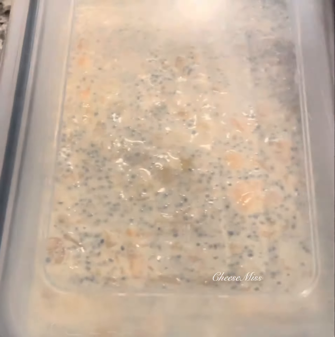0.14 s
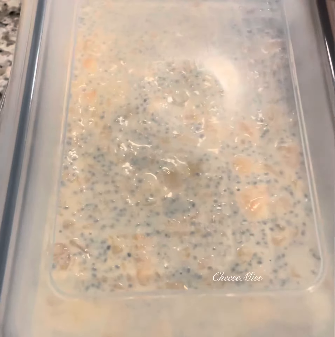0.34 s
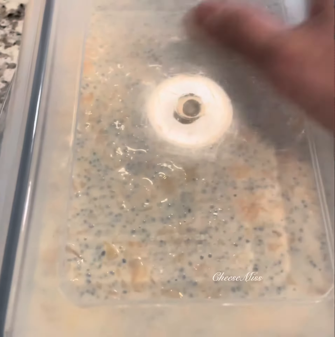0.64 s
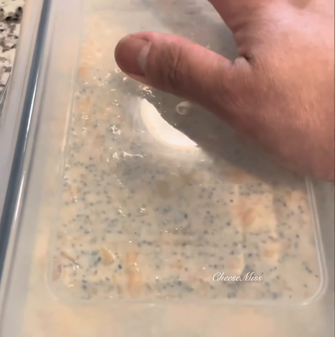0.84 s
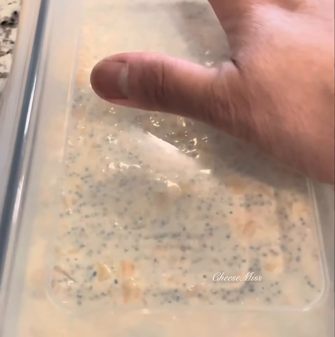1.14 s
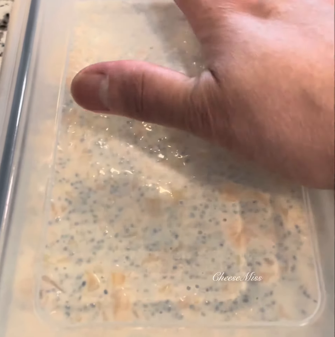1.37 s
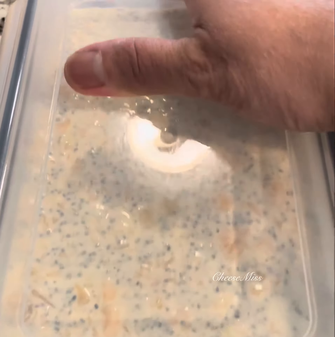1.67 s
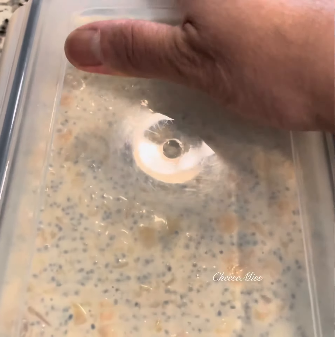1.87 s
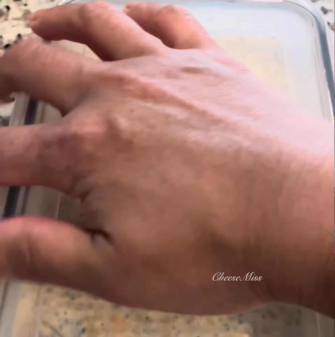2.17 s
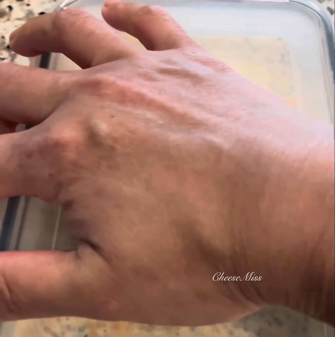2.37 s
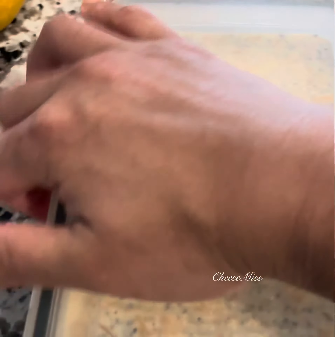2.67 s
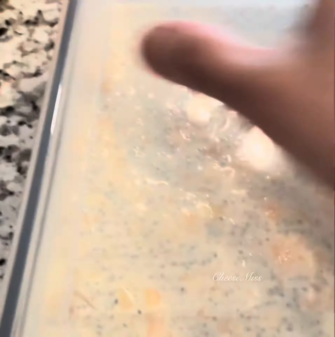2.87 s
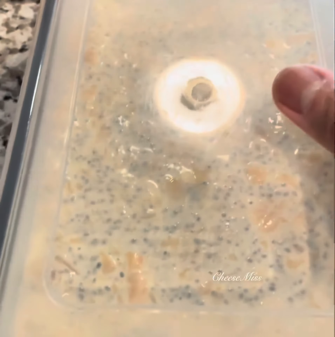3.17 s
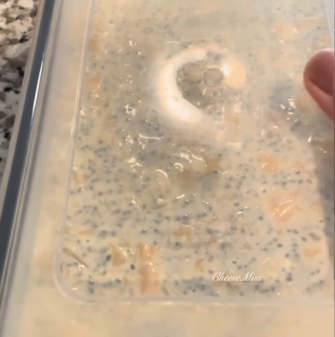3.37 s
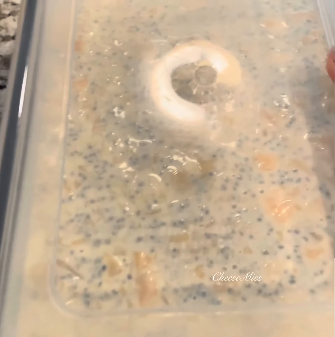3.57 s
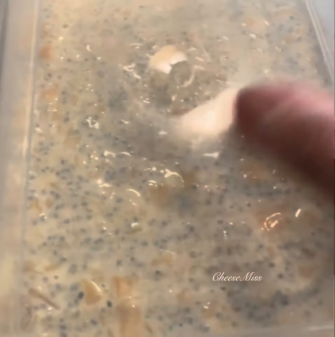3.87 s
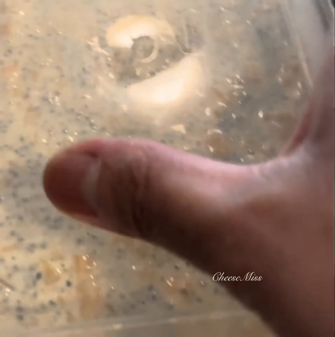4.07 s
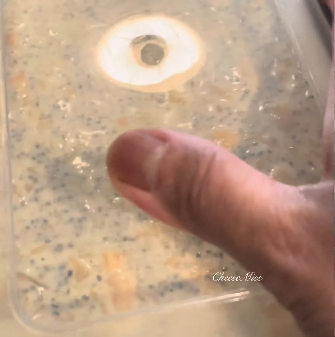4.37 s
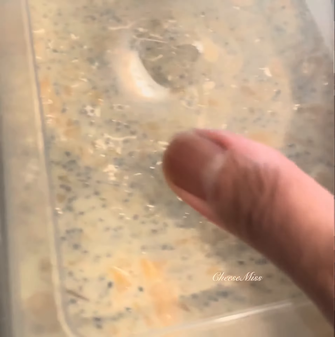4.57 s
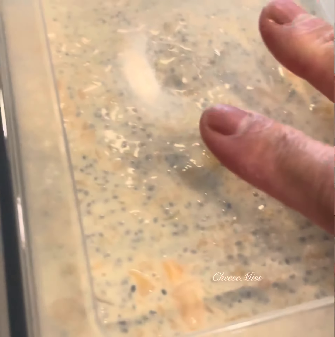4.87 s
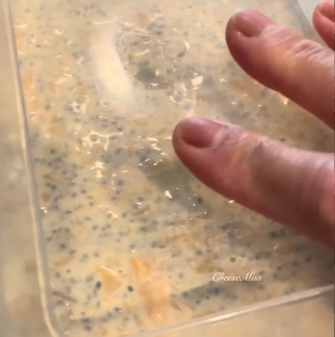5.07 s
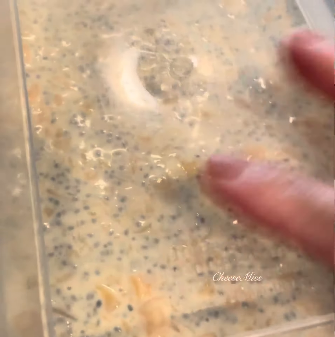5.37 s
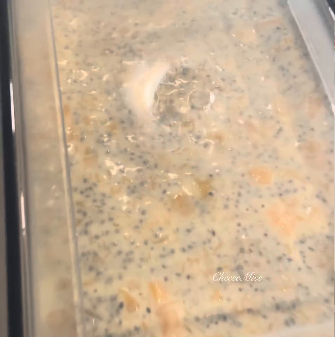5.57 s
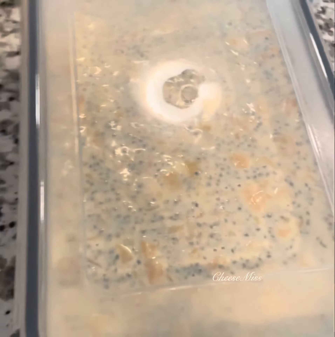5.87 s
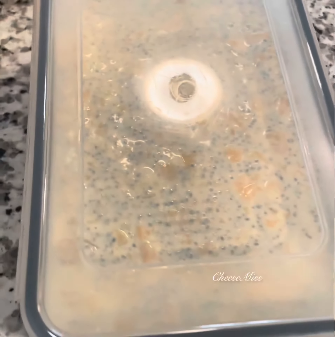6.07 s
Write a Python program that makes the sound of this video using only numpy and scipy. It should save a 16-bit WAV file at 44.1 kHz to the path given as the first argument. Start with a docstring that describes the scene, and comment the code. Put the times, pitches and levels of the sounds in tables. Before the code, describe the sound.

A thin plastic lid rattles loosely onto a food tub, then snaps and clicks sharply under a pressing hand in a quiet kitchen.

```python
"""A thin plastic lid knocks on a food tub and snaps shut by hand, close to two microphones in a quiet kitchen.
Each knock or snap runs through the lid as a bending wave, treble first, and rings its fading modes.
Uneven noise grains make the skin's scrape and swish; gliding narrow noise makes groans, creaks and a squeak.
Cracks leave a noisy rush, a short diffuse tail follows the near sounds, and the room hums below."""
import sys
import numpy as np
from scipy import signal
from scipy.fft import rfft, irfft
from scipy.io import wavfile

SR = 44100
rng = np.random.default_rng(int(sys.argv[2]) if len(sys.argv) > 2 else 0)


def amplitude_ratio(level_db):
    """Convert a level in decibels to the matching linear amplitude (field) ratio."""
    exponent = np.asarray(level_db, float) / 20
    return 10 ** exponent


def store_pcm(level_fs):
    """Save levels as 16-bit WAV."""
    pcm = np.round(np.clip(level_fs, -1, 1) * 32767).astype(np.int16)
    wavfile.write(sys.argv[1], SR, np.atleast_2d(pcm).T)


N = 275184  # length in samples
HZ = np.fft.rfftfreq(N, 1 / SR)


def snaps():
    """A short crackle travels as a bending wave and rings every mode; hand pressure detunes each blow."""
    # Ringing modes of the lid. Each row: usual pitch in Hz, level in dB, time to fade by 60 dB in seconds.
    lid_modes = [(71, -4, 0.031), (115, -4, 0.028), (238, -3.5, 0.029), (330, -6, 0.036),
                 (450, -24.5, 0.12), (600, -6, 0.02), (817.5, -13.5, 0.041), (1120, -1.5, .014),
                 (1387, -5, 0.015), (1767, -6.5, 0.014), (2050, -3, 0.00855), (2587, -3, 0.0071),
                 (3013, -5.5, 0.0066), (4104, -1, 0.006), (4935, 0, 0.0067), (5900, 4, 0.0031),
                 (7310, 4, 0.001), (9560, 0.5, 0.0011), (12040, -8, 0.0026), (15600, -24.5, 0.0037)]
    # Fading time of the hollow panel ring: loose, then held, in seconds for 60 dB.
    panel_t60_s = [0.039, .028]
    # Time a 1000 Hz wave needs to cross the lid: loose, then seated, in milliseconds.
    lag_ms = [0.56, 2.4]
    rim_t60_s, seated_from_s = 0.017, 0.7
    loose_panel_db = 2  # the hollow pitch stands out while the lid is loose
    lid_pan_db = -4  # left against right
    size = 8192  # samples
    s, body_db, thump_db, click_db, crack_db, panel_hz, rim_hz, rim_db = blows()
    mode_hz, mode_db, t60_s = np.transpose(lid_modes)
    hz = np.fft.rfftfreq(size, 1 / SR)
    z = np.exp(-2j * np.pi * hz / SR)
    chance = rng.standard_normal((len(s), 2, len(lid_modes)))
    crackle = rng.random((len(s), 64))
    out = np.zeros((2, N + 2 * size))
    for k in range(len(s)):
        drive = [(200, thump_db[k]), (330, body_db[k]), (850, body_db[k]),
                 (1400, click_db[k]), (2300, click_db[k]), (4500, crack_db[k])]
        level_db = at_hz(drive, mode_hz)
        # A loose lid rings long on one hollow pitch; seated and held, it is damped and the tub joins in.
        seated = int(s[k] > seated_from_s)
        level_db -= 11 * (1 - seated) * (mode_hz > 280) * (mode_hz < 1000)
        all_t60_s = np.append(t60_s, [panel_t60_s[seated]] * 2 + [rim_t60_s])
        r = amplitude_ratio(-60 / (all_t60_s * SR))[:, None]

        # Neighbouring lid modes start in opposite directions.
        strength = amplitude_ratio(level_db + mode_db + 2.0 * chance[k, 0]) * (-1) ** np.arange(len(lid_modes))
        panel_db = body_db[k] - 3.0 + loose_panel_db * (1 - seated)
        strength = np.append(strength, amplitude_ratio([panel_db, body_db[k] - 12.5, click_db[k] + rim_db[k]]))
        detuned_hz = mode_hz * np.exp(0.05 * chance[k, 1])
        all_hz = np.append(detuned_hz, [panel_hz[k], 0.87 * panel_hz[k], rim_hz[k]])
        w = 2 * np.pi * all_hz[:, None] / SR
        modes = np.sin(w) * z / (1 - 2 * r * np.cos(w) * z + (r * z) ** 2)

        # The release is ragged: each part of the treble lets go up to 3.3 ms late.
        late_s = 0.0033 * np.interp(hz, np.linspace(0, SR / 2, 64), crackle[k])
        ragged = hz ** 2 / (hz ** 2 + 1500 ** 2)
        push = (1 - ragged) + ragged * np.exp(-2j * np.pi * np.cumsum(late_s) * hz[1])

        # Bending waves travel at a speed that grows with the root of frequency.
        travel = np.exp(-4j * np.pi * lag_ms[seated] / 1000 * np.sqrt(1000 * np.maximum(hz, 60)))
        wave = irfft(push * travel * (strength @ modes), size)[:size // 2]

        # The first strong part of the wave falls on the time of the blow.
        onset = np.argmax(np.abs(wave) > 0.15 * np.abs(wave).max())
        at = size + round(s[k] * SR) - onset
        out[:, at:at + len(wave)] += wave * amplitude_ratio([[lid_pan_db / 2], [-lid_pan_db / 2]])
    return out[:, size:size + N]


def blows():
    """Knocks and snaps as columns; a grip bends the seated lid and so sets the pitches of the snaps under it."""
    # The loose lid knocks on the rim, its hollow pitch broadly sinking as it settles.
    # Each row: start in seconds, body in dB, thump in dB, click in dB, pitch of the panel in Hz.
    knocks = [(0.026, -6.5, -19, -17, 924), (0.084, -9.5, -30.5, -20, 868), (0.095, -14, -34, -28.5, 850),
              (0.107, -18, -17, -28, 742), (0.132, -31.5, -24.5, -39, 815), (0.16, -22, -21, -25, 730),
              (0.281, -35.5, -42, -48, 745), (0.307, -27, -44.5, -51, 713),
              (0.39, -19.5, -16.5, -28.5, 570), (0.399, -15.5, -56, -33, 680),
              (0.419, -28, -41.5, -26, 640), (0.446, -20.5, -37, -23.5, 730),
              (0.453, -10.5, -32, -12.5, 774), (0.468, -16, -15, -24.5, 593), (0.477, -4, -44, -10.5, 600),
              (0.496, -12, -48.5, -25, 628), (0.509, -31, -42, -50.5, 600), (0.532, -32, -31, -60, 650),
              (0.572, -38.5, -33, -32.5, 475)]
    # The seated lid snaps and ticks under the hand.
    # Each row: start in seconds, body in dB, thump in dB, click in dB, crack in dB.
    snap_rows = [(0.791, -36.5, -45, -43, -54.5), (0.996, -35, -41, -29.5, -41.5),
                 (1.109, -25, -49, -26, -57), (1.119, -24, -44, -18, -37), (1.123, -20, -49, -19, -35.5),
                 (1.131, -8.5, -23, -10, -23), (1.143, -6, -12, -16.5, -20), (1.152, -17, -16, -37, -61),
                 (1.525, -32.5, -35, -34, -55), (1.72, -22.5, -32, -22.5, -33.5),
                 (1.738, -25, -31.5, -24, -28), (1.749, -2, -37.5, -7, -14.5),
                 (1.843, -34, -44.5, -40, -64.5), (1.907, -32.5, -58, -49.5, -67),
                 (2.086, -42, -48, -45, -48.5), (2.102, -28, -40.5, -32.5, -45.5),
                 (2.124, -35.5, -25, -48, -51), (2.206, -47, -55.5, -32, -42.5),
                 (2.503, -13, -20.5, -8.5, -6.5), (2.515, -55, -56.5, -29.5, -32.5),
                 (2.52, -48, -50.5, -39, -28.5), (2.836, -36, -49, -44.5, -39),
                 (2.841, -37, -39, -43.5, -39.5), (2.97, -27.5, -50, -24.5, -40.5),
                 (3.024, -40.5, -40.5, -36.5, -54), (3.056, -32, -36.5, -43.5, -60),
                 (3.081, -29, -22.5, -39.5, -50), (3.191, -37, -36, -25, -33.5),
                 (3.196, -35, -29, -30, -37), (3.206, -38, -42.5, -34.5, -58),
                 (3.634, -41.5, -40, -37, -81), (3.78, -28.5, -31, -44, -39.5),
                 (3.985, -35.5, -32, -47, -70), (4.034, -27.5, -18, -37, -52),
                 (4.058, -30, -19.5, -39, -52), (4.254, -45.5, -38, -37, -51), (4.306, -6.5, -20, -3, -11),
                 (4.314, -13, -14, -34, -32), (4.375, -34, -41, -27.5, -40),
                 (4.506, -31, -34.5, -36.5, -58), (4.517, -30.5, -25, -40.5, -56),
                 (4.534, -27.5, -34, -32.5, -38.5), (4.544, -37, -44, -31, -45.5),
                 (4.556, -35, -42, -39.5, -48.5), (4.809, -27, -37.5, -37, -40),
                 (5.035, -9.5, -35, -22, -23.5), (5.043, -6.5, -23, -15, -13.5),
                 (5.249, -32, -51.5, -43, -55), (5.273, -30, -51, -49.5, -51)]
    # Tuning of the lid under each grip.
    # Each row: from when in seconds, panel pitch in Hz, rim pitch in Hz, rim ring against the click in dB.
    grips = [(0, 690, 1250, -6.5), (.9, 303, 1270, -4.5), (1.127, 357.2, 1160, 1), (1.138, 321, 2480, -3),
             (1.3, 340, 1464, -4.5), (1.65, 382.5, 2540, 1), (1.73, 385, 1250, -0.5), (2.0, 330, 1260, -5),
             (2.4, 417, 2184, -5.5), (2.9, 477, 2580, -4.5), (3.04, 307, 1120, 7), (3.15, 330, 2500, -2.5),
             (3.5, 323, 1390, 2), (3.72, 440, 1150, 0.5), (4.2, 427, 1051, -3.5), (4.31, 260, 2050, -9),
             (4.45, 450, 1542, 2), (4.525, 479, 2340, -4.5), (4.97, 400, 1650, 5), (5.039, 450, 2020, 3.5),
             (5.15, 492.4, 2050, 2.5)]
    knock_s, knock_body, knock_thump, knock_click, knock_hz = np.transpose(knocks)
    knock_crack = knock_click - 11.5  # dB
    knock = [knock_s, knock_body, knock_thump, knock_click, knock_crack]
    s, body_db, thump_db, click_db, crack_db = np.hstack([knock, np.transpose(snap_rows)])
    from_s, *tuning = np.transpose(grips)
    grip = np.maximum(np.searchsorted(from_s, s) - 1, 0)
    panel_hz, rim_hz, rim_db = np.array(tuning)[:, grip]
    panel_hz = np.append(knock_hz, panel_hz[len(knocks):])
    return s, body_db, thump_db, click_db, crack_db, panel_hz, rim_hz, rim_db


def rub():
    """Skin slips in dense uneven grains: a scrape on the lid and an airy swish above it."""
    # The hand slides over the lid.
    # Each row: peak time in seconds, length in seconds, scrape in dB, swish in dB.
    strokes = [(0.0, 0.2, -57.5, -68), (0.207, 0.145, -77, -72.5), (0.426, 0.207, -50, -72),
               (0.634, 0.19, -73, -64.5), (.99, 0.125, -72, -69.5), (1.137, 0.29, -56, -70),
               (1.41, 0.114, -92.5, -85), (1.627, 0.22, -66.5, -69), (1.797, 0.26, -54, -69.5),
               (2.078, 0.5, -75, -73), (2.252, 0.77, -70, -76.5), (2.51, 0.34, -59.5, -58),
               (2.684, 0.154, -55, -68.5), (3.004, 0.33, -61, -73.5), (3.198, 0.13, -59, -74),
               (3.44, 0.21, -65, -82.5), (3.759, 0.13, -57, -66), (3.877, 0.32, -71.5, -63.5),
               (4.311, 0.2545, -48.5, -62), (4.65, .14, -57, -55), (4.552, .08, -55, -69),
               (5.06, 0.6, -65, -77), (5.257, 0.194, -60, -90), (5.33, 0.11, -79, -68),
               (6.14, 0.188, -87, -77.5)]
    # Level of the resting hand: scrape, then swish, in dB.
    rest_db = [-64, -87]
    # Colour of the scrape, then of the swish. Each row: pitch in Hz, relative level in dB per Hz.
    rub_colour = [
        [(400, -14.5), (900, 6.5), (2000, -3), (3500, -7), (5500, -11.5), (7500, -15.5), (9000, -35.5)],
        [(6500, -15), (8500, -6.5), (10500, -7.5), (12500, -13.5), (13800, -27), (15300, -8.5), (16300, -31.5)],
    ]
    edge_db, rise_share = 19.5, 0.34  # fall at both ends of a stroke; part of its length spent rising
    wobble_db, wobble_hz = 5, 9.1  # skin drags unevenly
    settle_db, settle_t60_s = -28.5, 0.15  # level against the click; seconds to fade by 60 dB
    grains = rng.standard_normal(N) * amplitude_ratio(2.0 * rng.exponential(1, N))
    t = np.arange(N) / SR
    # Both strengths are powers, so that strokes add up.
    scrape = np.full(N, amplitude_ratio(rest_db[0]) ** 2)
    swish = np.full(N, amplitude_ratio(rest_db[1]) ** 2)
    for peak_s, length_s, scrape_db, swish_db in strokes:
        share = np.where(t < peak_s, rise_share, 1 - rise_share)
        away = (t - peak_s) / length_s / share
        shape = amplitude_ratio(-edge_db * np.minimum(away ** 2, 9)) ** 2
        scrape = scrape + shape * amplitude_ratio(scrape_db) ** 2
        swish = swish + shape * amplitude_ratio(swish_db) ** 2
    r = np.exp(-2 * np.pi * wobble_hz / SR)
    wobble = rms_one(signal.lfilter([1], [1, -2 * r, r * r], rng.standard_normal(N)))
    swish = swish * amplitude_ratio(wobble_db * wobble) ** 2
    # After each blow the lid scrapes into place.
    s, _, _, click_db, *_ = blows()
    scrape = scrape + dying(s, click_db + settle_db, settle_t60_s)
    scrape_sound = np.sqrt(scrape) * coloured(grains, rub_colour[0])
    return scrape_sound + np.sqrt(swish) * coloured(grains, rub_colour[1])


def rush():
    """Air and grit rush after each crack: coloured noise that dies away."""
    # Colour of the rush. Each row: pitch in Hz, relative level in dB per Hz.
    rush_colour = [(800, -19.5), (1800, -10), (3000, -1.5), (4500, 0), (6000, -2), (7200, -7.5),
                   (8500, -29.5)]
    rush_db, rush_t60_s = -43.5, 0.93  # level against the crack; seconds to fade by 60 dB
    s, _, _, _, crack_db, *_ = blows()
    power = dying(s, crack_db + rush_db, rush_t60_s)
    return np.sqrt(power) * coloured(rng.standard_normal(N), rush_colour)


def dying(s, level_db, t60_s):
    """Power that jumps at each blow and dies away."""
    kicks = np.zeros(N)
    np.add.at(kicks, (s * SR).astype(int), amplitude_ratio(level_db) ** 2)
    return signal.lfilter([1], [1, -amplitude_ratio(-60 / (t60_s * SR)) ** 2], kicks + 1e-18)


def groan():
    """The bent panel groans under the thumb as stick and slip drive its gliding resonance."""
    # Glides of the flexing lid. Each row: time in seconds, pitch in Hz, relative level in dB.
    groan_glides = [
        [(3.44, 455, -55.5), (3.492, 399, -48.5), (3.5, 425, -48), (3.542, 410, -50), (3.57, 466, -63)],
        [(3.57, 394, -51), (3.594, 380, -42.5), (3.636, 369, -41.5), (3.67, 340, -42.5), (3.7, 386, -76)],
        [(4.17, 430, -56), (4.21, 399, -48.5), (4.26, 345, -51.5), (4.29, 400, -44)],
    ]
    return narrow_noise(groan_glides, width_hz=114, overtone_db=-36.5)


def creak():
    """A rougher, wider resonance creaks while the lid is forced down or settles."""
    # Glides of the creak. Each row: time in seconds, pitch in Hz, relative level in dB.
    creak_glides = [
        [(1.06, 600, -71), (1.1, 791, -43.5), (1.13, 802, -36), (1.14, 790, -45)],
        [(1.17, 330, -64), (1.22, 330, -53.5), (1.26, 330, -49), (1.28, 330, -38)],
        [(5.24, 519.3, -45), (5.28, 510.4, -47.5), (5.31, 526, -46)],
    ]
    return narrow_noise(creak_glides, width_hz=510, overtone_db=-24)


def squeak():
    """Skin squeaks as it skids before a snap, with a strong overtone."""
    # Glide of the squeak. Each row: time in seconds, pitch in Hz, relative level in dB.
    squeak_glide = [(2.43, 5900, -68), (2.45, 5560, -56.5), (2.48, 4400, -59.5), (2.5, 4000, -51)]
    return narrow_noise([squeak_glide], width_hz=680, overtone_db=-0.5)


def narrow_noise(tables, width_hz, overtone_db):
    """Stick and slip drive a narrow gliding resonance: a tone whose size and phase wander."""
    out, s = np.zeros(N), np.arange(N) / SR
    r = np.exp(-np.pi * width_hz / SR)
    a, b = signal.lfilter([1], [1, -2 * r, r * r], rng.standard_normal((2, N)))
    wander = 0.86 + rms_one(a) + 1j * rms_one(b)
    for rows in tables:
        hz, level_db = in_time(rows, s)
        # Fade in and out over 21 ms.
        edge = np.clip(np.minimum(s - rows[0][0], rows[-1][0] - s) / 0.021, 0, 1)
        turn = np.exp(2j * np.pi * np.cumsum(hz) / SR)
        out += edge * amplitude_ratio(level_db) * np.real(wander * (turn + amplitude_ratio(overtone_db) * turn ** 2))
    return out


def room(x):
    """Diffuse tail: noise that dies band by band, differing most between the sides around 800 Hz."""
    # Fading of the room. Each row: pitch in Hz, time to fade by 60 dB in seconds.
    room_t60 = [(150, 1), (600, 0.38), (2500, 0.94), (8000, 0.24)]
    nearby_db, nearby_t60_s = 7.5, 0.11  # dense echoes from counter and wall; fades on top of the room's fading
    t = np.arange(SR) / SR
    tail = 0
    for low in 70 * 2.0 ** np.arange(7):  # one octave at a time, from 70 Hz
        band = signal.butter(2, [low, 2 * low], "band", fs=SR, output="sos")
        mid, side = signal.sosfilt(band, rng.standard_normal((2, SR)))
        unlike = amplitude_ratio(at_hz([(100, -50.5), (800, 3), (2500, -36.5), (5000, -19.5)], np.sqrt(2) * low))
        t60_s = max(at_hz(room_t60, 1.4 * low), 0.05)
        tail = tail + (mid + unlike * side * [[1], [-1]]) * amplitude_ratio(-60 * t / t60_s)
    tail = tail * (1 + amplitude_ratio(nearby_db - 60 * t / nearby_t60_s))
    tail = tail * np.clip((t - 0.004) / 0.00077, 0, 1)  # silent for the first 4 ms
    tail = tail / np.sqrt(np.sum(tail ** 2) / 2)
    return signal.fftconvolve(x[None], tail, axes=1)[:, :N]


def microphone_pair(x):
    """Sound reaches the two sides with a phase lead and a tilt that depend on frequency."""
    # Phase between the microphones. Each row: pitch in Hz, how far the left leads in radians.
    lead = [(0, 0), (300, -.35), (650, -.95), (1400, .3), (2070, .5), (2750, -.4), (3450, .9), (4130, .8),
            (4820, -.3), (5500, .6), (7580, 3.14), (11000, 6.28), (14200, 9.42), (15200, 10.2),
            (16400, 10.4)]
    # Balance of the microphones. Each row: pitch in Hz, left against right in dB.
    tilt = [(60, 2), (110, 1.5), (200, 2), (380, 3.5), (700, 0), (1290, -1.5), (2380, 0.5), (4400, 1),
            (8120, 0.5), (15000, 4)]
    half = amplitude_ratio(at_hz(tilt, HZ) / 2) * np.exp(0.5j * np.interp(HZ, *np.transpose(lead)))
    return irfft(rfft(x) * np.array([half, 1 / half]), N)


def hum():
    """Steady room tone: one coloured noise shared by both sides and one that is opposite on them."""
    # Colour of the shared tone. Each row: pitch in Hz, relative level in dB per Hz.
    hum_mid = [(15, -35), (25, 1), (49, -4.5), (127, -2.5), (149, -10.5), (217, -5), (293, -12), (326, -8),
               (463, -11.5), (531, -10.5), (714, -20), (775, -20), (2550, -31.5), (2840, -32.5),
               (16000, -109)]
    # Colour of the tone that differs between the sides. Each row: pitch in Hz, relative level in dB per Hz.
    hum_side = [(15, -46.5), (25, -34), (97, -14.5), (531, 2.5), (1520, -6), (1840, -13), (3340, -10),
                (10100, -48), (11000, -68), (14400, -49), (16000, -76.5)]
    mid, side = rng.standard_normal((2, N))
    shared = amplitude_ratio(-50.5) * coloured(mid, hum_mid)
    return shared + amplitude_ratio(-58) * coloured(side, hum_side) * [[1], [-1]]


def rms_one(x):
    """Scale to rms 1."""
    return x / np.sqrt(np.mean(x ** 2) + 1e-20)


def in_time(rows, s):
    """Columns of a curve table at the times s."""
    t, *columns = np.transpose(rows)
    return [np.interp(s, t, c) for c in columns]


def at_hz(points, hz):
    """A spectrum table read on a log-frequency axis."""
    point_hz, value = np.transpose(points)
    return np.interp(np.log(hz + 1), np.log(point_hz + 1), value)


def coloured(x, spectrum):
    """Give x a spectrum; rms 1."""
    return rms_one(irfft(rfft(x) * amplitude_ratio(at_hz(spectrum, HZ)), N))


def scene():
    """Lid and hand close by, their tail in the room, the room tone."""
    near = snaps() + rub() + rush() + groan() + creak() + squeak()
    tail = amplitude_ratio(-21) * room(near.mean(axis=0))
    return microphone_pair(near + tail) + hum()


def top_cut(x):
    """Nothing passes above the cut-off."""
    return signal.sosfilt(signal.butter(12, 16810, fs=SR, output="sos"), x)


def record(dry):
    """The deepest bass is cut; gain control ducks after loud snaps and recovers; peaks are rounded."""
    t = np.arange(N) / SR
    over_db = np.maximum(20 * np.log10(np.abs(dry).max(axis=0) + 1e-9) + 1.6, 0)
    # The held peak falls by about 40 dB a second; the small mismatch lowers the gain very slowly.
    held_db = np.maximum.accumulate(over_db + 39.975 * t) - 39.92 * t
    duck_db = 0.4 * signal.lfilter([0.004], [1, -0.996], held_db)
    bass_cut = signal.butter(2, 45, "high", fs=SR, output="sos")
    x = signal.sosfilt(bass_cut, dry) * amplitude_ratio(-duck_db)
    return top_cut(1.517 * np.tanh(x / 0.9254))


dry = scene()
out = record(dry)
store_pcm(out)
```